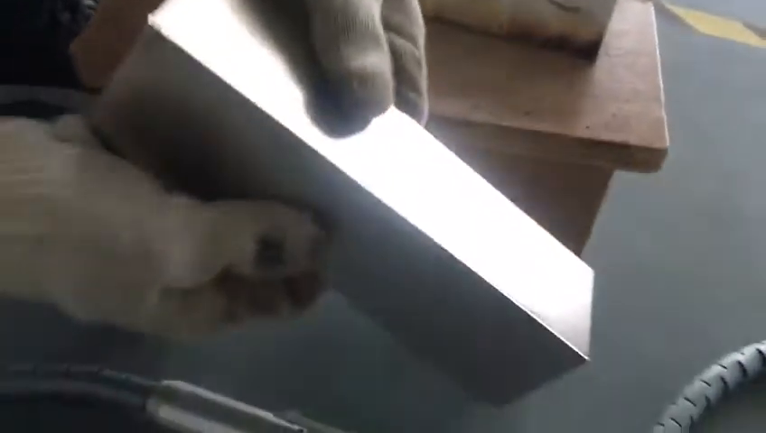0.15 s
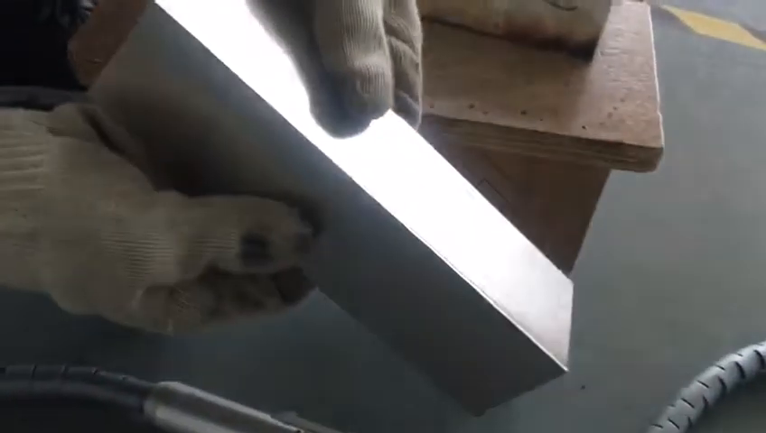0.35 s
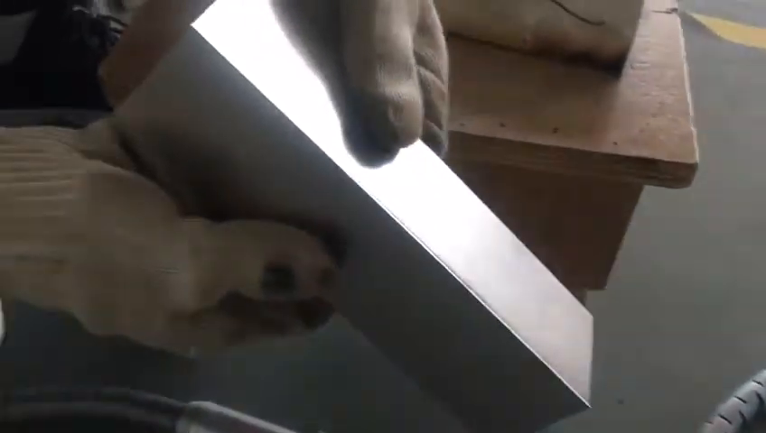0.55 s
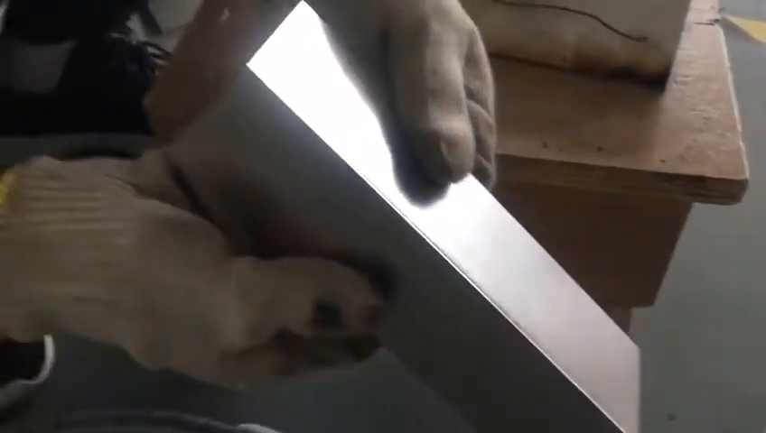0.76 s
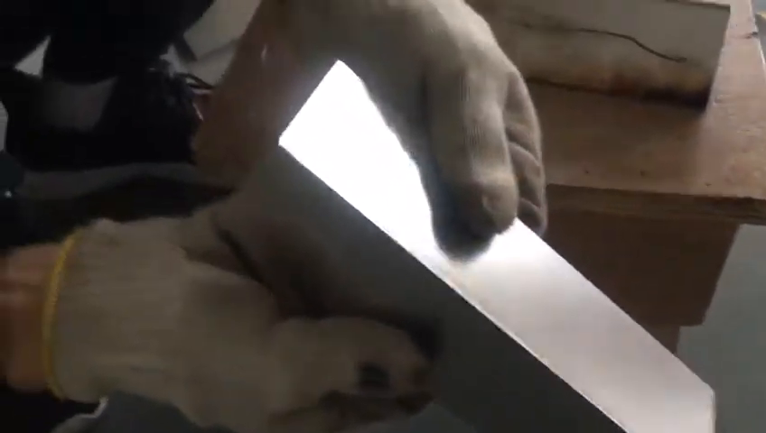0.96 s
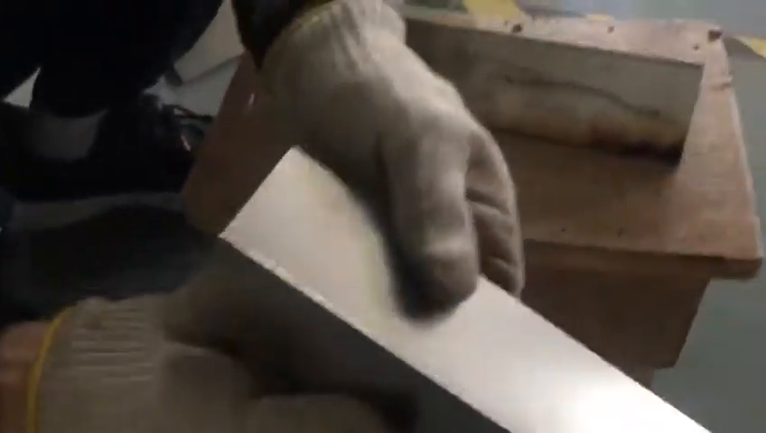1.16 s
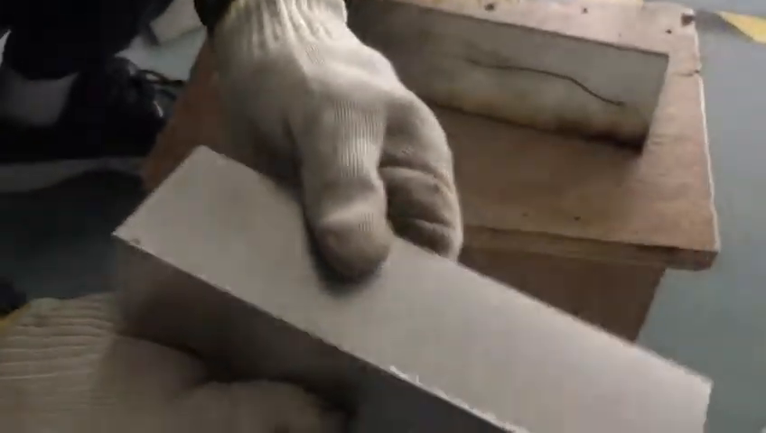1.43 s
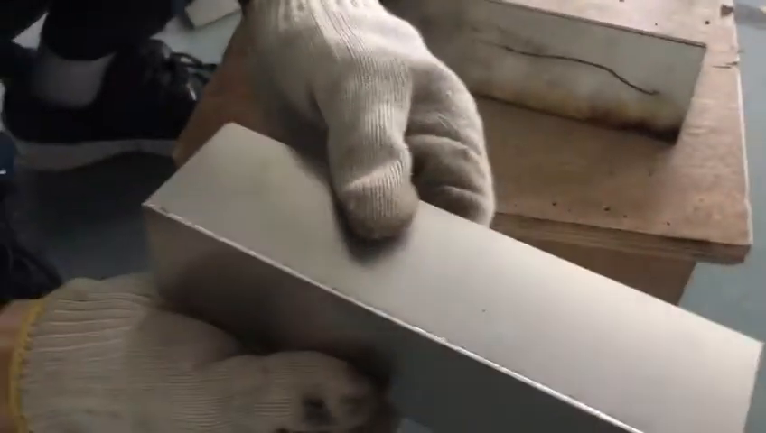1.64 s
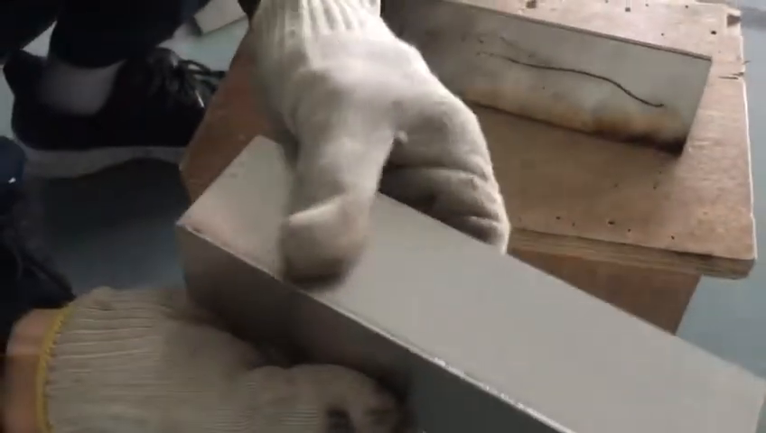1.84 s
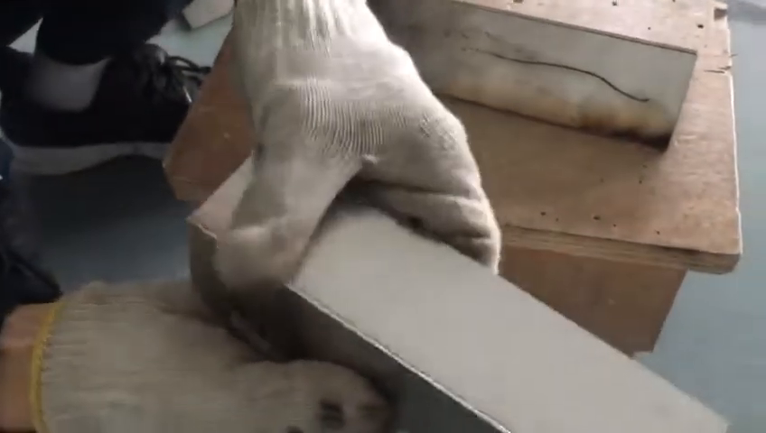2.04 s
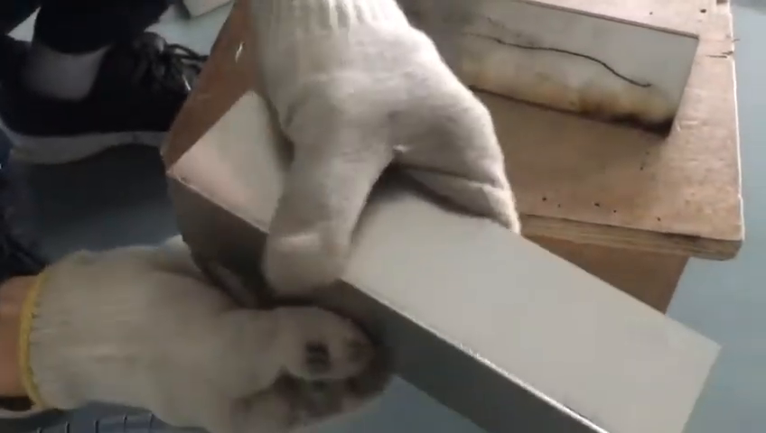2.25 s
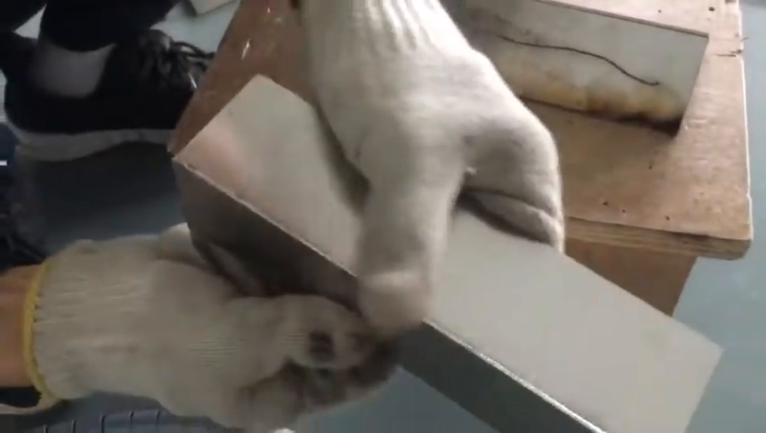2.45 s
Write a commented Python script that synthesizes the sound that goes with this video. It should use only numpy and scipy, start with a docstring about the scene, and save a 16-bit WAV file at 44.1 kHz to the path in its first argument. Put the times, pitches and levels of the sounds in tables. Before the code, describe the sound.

Rapid, steady machine knocking with fan rush and deep hum, faint glove rustle on steel

```python
"""Quick, even knocks and rattles come first: the cooling pump of an idle welding machine in a workshop.
Blows ring damped modes of its housing, and one stretch of coloured noise repeats in every cycle.
Gloved hands turn a steel box section: noise bursts rustle and slip, narrow noise bands ring faintly.
Behind them lie the rush of fans (coloured noise), wavering hums and a low, swelling rumble."""
import sys
import numpy as np
from scipy import signal
from scipy.fft import rfft, irfft
from scipy.io import wavfile

SR = 44100
rng = np.random.default_rng(int(sys.argv[2]) if len(sys.argv) > 2 else 0)


def store_wav(level_fs):
    """Save 16-bit WAV to argv[1]."""
    pcm = np.round(np.clip(np.atleast_2d(level_fs), -1, 1) * 32767)
    wavfile.write(sys.argv[1], SR, pcm.T.astype(np.int16))


N = 114660
T = np.arange(N) / SR
BINS_HZ = np.arange(N // 2 + 1) * SR / N


def from_db(db):
    """Decibels to amplitude gain."""
    return 10 ** (np.asarray(db) / 20)


def rms_one(x):
    """Scale to unit rms."""
    return x / np.sqrt(np.mean(x ** 2) + 1e-20)


def level(rows):
    """Gain along a curve of (s, dB), linear in dB between points."""
    return from_db(np.interp(T, *np.transpose(rows)))


def noise(spectrum, size):
    """Gaussian noise shaped by a spectrum of (Hz, dB); loops without a seam, rms 1."""
    hz, db = np.transpose(spectrum)
    f = np.maximum(np.arange(size // 2 + 1) * SR / size, 1)
    gain = from_db(np.interp(np.log(f), np.log(hz), db)) * (f > 1)
    return rms_one(irfft(rfft(rng.standard_normal(size)) * gain, size))


def drift(rate_hz):
    """Random motion low-passed near rate_hz; rms 1."""
    lowpass = 1 / (1 + (BINS_HZ / rate_hz) ** 2) ** 2
    return rms_one(irfft(rfft(rng.standard_normal(N)) * lowpass, N))


def whine(hz, width_hz):
    """A sine whose pitch wavers by width_hz rms and strength by 2 dB rms; rms 1."""
    pitch_hz = hz + width_hz * drift(2 * width_hz)
    phase = 2 * np.pi * np.cumsum(pitch_hz) / SR
    strength = from_db(2 * drift(2 * width_hz))
    return rms_one(np.sin(phase) * strength)


def swell(start_s, swell_s):
    """An envelope that rises to 1 in swell_s, then dies away."""
    age = np.maximum(T - start_s, 0) / swell_s
    return age * np.exp(1 - age)


CYCLE_S, KNOCK_SPREAD_DB = .1573, 1


def ring(blows, hz, swell_s):
    """One damped mode struck by the same blows (s, dB) each cycle, with random spread in force."""
    clicks = np.zeros(N + SR)
    for start_s, db in blows:
        times_s = np.arange(start_s % CYCLE_S, (N + SR) / SR + CYCLE_S, CYCLE_S)
        at = (times_s * SR).astype(int)
        at = at[at < N + SR]
        clicks[at] += from_db(db + KNOCK_SPREAD_DB * rng.standard_normal(len(at)))
    mode = swell(0, swell_s) * np.sin(2 * np.pi * hz * T)
    run_in = int(2 * CYCLE_S * SR)  # start with the mode already ringing
    return signal.fftconvolve(clicks, mode)[run_in:run_in + N]


# Knocks of the pump. Each row: time in seconds (wraps at the cycle), relative level in dB.
PUMP_KNOCKS = [(.108, 2.5), (.1284, -2.6), (.1474, -8.5), (.1709, -4.7), (.2078, -5)]
# Housing modes. Each row: frequency in Hz, relative level in dB, swell time in seconds.
HOUSING_MODES = [(242.6, -18.5, 0.018), (302.8, -0.5, 0.0069), (323.86, -6.5, 0.023), (569, -18.5, 0.022),
                 (612.5, -19, 0.015), (649, -17.5, 0.0044)]
# Dull thumps. Each row: time in seconds (wraps at the cycle), mean level in dB.
PUMP_THUMPS = [(.172, -33), (.231, -24)]
# Rattle spectrum. Each row: frequency in Hz, relative density in dB per Hz.
RATTLE_SPECTRUM = [(40, -19.5), (75, -13), (105, -1.5), (140, 3), (200, -10), (260, -5.5), (350, -9.5),
                   (440, -10.5), (620, -12), (760, -20), (1300, -22.5), (1650, -18.5), (2000, -40),
                   (4000, -65)]
KNOCK_DB, RATTLE_DB = -22, -36.5
THUMP_HZ, THUMP_SWELL_S = 135.4, .0058


def pump():
    """Knocks ring the housing modes; thumps and a loose rattle repeat with them."""
    knocks = np.zeros(N)
    for hz, db, swell_s in HOUSING_MODES:
        knocks += from_db(KNOCK_DB + db) * ring(PUMP_KNOCKS, hz, swell_s)
    thumps = ring(PUMP_THUMPS, THUMP_HZ, THUMP_SWELL_S)
    one_rattle = noise(RATTLE_SPECTRUM, size=round(CYCLE_S * SR))
    rattle = from_db(RATTLE_DB) * np.resize(one_rattle, N)
    return knocks + thumps + rattle


# Glove rustle over time. Each row: time in seconds, relative level in dB.
RUSTLE_LEVEL = [(0.01, -57.5), (0.04, -63), (0.09, -71.5), (0.42, -66.5), (0.6, -74), (0.97, -71),
                (1.16, -69), (1.33, -71.5), (1.82, -73.5), (1.89, -67), (1.99, -64), (2.08, -65),
                (2.15, -68.5), (2.22, -61), (2.58, -59)]
# Rustle spectrum. Each row: frequency in Hz, relative density in dB per Hz.
RUSTLE_SPECTRUM = [(1500, -12.5), (3500, 4), (6000, -0.5), (8000, -0.5), (11000, -2), (12000, -14)]
RUSTLE_DB, RUSTLE_GRAIN_DB, RUSTLE_GRAIN_HZ = 1.5, 1.5, 120


def glove_rustle():
    """Cloth sliding over steel: coloured noise with a fine random grain in its level."""
    grain = from_db(RUSTLE_DB + RUSTLE_GRAIN_DB * drift(RUSTLE_GRAIN_HZ))
    return level(RUSTLE_LEVEL) * grain * noise(RUSTLE_SPECTRUM, size=N)


# Glove slips as the grip shifts. Each row: start in seconds, level in dB.
GLOVE_SLIPS = [(.24, -61), (.4, -63), (.54, -64), (.66, -67), (1.035, -63), (1.08, -67), (1.145, -62),
               (1.255, -62.5), (1.385, -64), (1.495, -67), (2.26, -69), (2.495, -64)]
# Slip spectrum. Each row: frequency in Hz, relative density in dB per Hz.
SLIP_SPECTRUM = [(2500, -14), (4500, 9), (6500, 3.5), (8500, -3.5), (11500, -22)]
SLIP_SWELL_S = .014


def glove_slips():
    """Short slips of the cloth: bursts of one coloured noise."""
    bursts = sum(from_db(db) * swell(start_s, SLIP_SWELL_S) for start_s, db in GLOVE_SLIPS)
    return bursts * noise(SLIP_SPECTRUM, size=N)


TOUCH_HALF_WIDTH_HZ, TOUCH_SKIRT = 90, 1.1  # skirt: steepness of the flanks


def steel(hz):
    """A steel resonance excited by rubbing: noise in a narrow peak; rms 1."""
    offset = (BINS_HZ - hz) / TOUCH_HALF_WIDTH_HZ
    gain = (1 + offset ** 2) ** (-TOUCH_SKIRT / 2)
    return rms_one(irfft(rfft(rng.standard_normal(N)) * gain, N))


# Light touches on the steel. Each row: start in seconds, ring in Hz, level in dB, swell time in seconds.
STEEL_TOUCHES = [(0.0, 8250, -62, 0.0093), (.38, 7300, -69.5, .06), (1.84, 8700, -70, 0.035),
                 (1.885, 11100, -71, 0.03)]


def steel_touches():
    """Light touches draw thin, hissy rings from the steel resonances."""
    rings = np.zeros(N)
    for start_s, hz, db, swell_s in STEEL_TOUCHES:
        rings += from_db(db) * swell(start_s, swell_s) * steel(hz)
    return rings


# Level curves of the rumbles. Each row: time in seconds, level in dB (relative for the lower two).
RUMBLE_LEVEL = [(0.0, -30), (0.11, -35.5), (0.16, -27), (0.2, -35), (0.25, -25), (0.39, -38), (0.46, -27.5),
                (0.57, -27), (0.67, -33.5), (0.87, -36.5), (0.94, -29), (1.02, -39), (1.28, -37),
                (1.34, -31), (1.42, -24), (1.55, -41.5), (1.67, -25.5), (1.77, -35.5), (2.0, -29),
                (2.06, -41), (2.18, -28), (2.24, -41), (2.6, -41)]
DEEP_LEVEL = [(0.0, -52), (0.13, -31), (0.26, -45), (0.98, -32.5), (1.04, -38), (1.4, -30), (1.64, -54),
              (1.8, -35.5), (2.53, -26.5), (2.6, -31)]
DRONE_LEVEL = [(0.0, -35), (0.18, -46), (0.24, -29.5), (0.42, -40), (0.54, -30), (0.72, -46), (0.85, -34),
               (1.25, -40.5), (1.34, -33), (1.46, -56), (1.53, -32.5), (1.7, -40), (1.82, -35), (2.3, -42),
               (2.43, -31.5), (2.5, -44.5), (2.6, -36)]
RUMBLE_HZ, RUMBLE_WANDER_HZ, RUMBLE_DB = 71.3, 2.35, 1.5
DEEP_HZ, DEEP_DB = 55.8, -2
DRONE_HZ, DRONE_WANDER_HZ = 138.85, 7.2


def rumbles():
    """Three low tones of wandering pitch, each swelling and sinking on its own curve."""
    rumble = from_db(RUMBLE_DB) * level(RUMBLE_LEVEL) * whine(RUMBLE_HZ, RUMBLE_WANDER_HZ)
    deep = from_db(DEEP_DB) * level(DEEP_LEVEL) * whine(DEEP_HZ, RUMBLE_WANDER_HZ)
    drone = level(DRONE_LEVEL) * whine(DRONE_HZ, DRONE_WANDER_HZ)
    return rumble + deep + drone


# Fan noise spectrum. Each row: frequency in Hz, relative density in dB per Hz.
FAN_SPECTRUM = [(20, -19.5), (36, -16.5), (52, -5), (80, 1), (100, -1), (145, -2), (185, -2.5), (215, -4.5),
                (260, -7.5), (305, -3), (360, -3.5), (440, -15.5), (550, -11.5), (630, -10), (740, -18),
                (1100, -18), (1400, -23), (1680, -22.5), (1950, -28.5), (3000, -35.5), (4000, -41.5),
                (4600, -41), (5000, -49), (8000, -57), (11500, -67)]
FANS_DB, FANS_FLUTTER_DB, FANS_FLUTTER_HZ = -29, .5, 28


def fan_air():
    """Rushing air: coloured noise with a slight flutter in level."""
    flutter = from_db(FANS_DB + FANS_FLUTTER_DB * drift(FANS_FLUTTER_HZ))
    return flutter * noise(FAN_SPECTRUM, size=N)


# Motor hums and whines. Each row: frequency in Hz, rms level in dB, pitch spread in Hz.
MOTOR_HUMS = [(571, -51.5, 2.94), (611.5, -51, 4), (780, -55, 5), (879.4, -56, 2.5), (1004, -58.5, 4),
              (1097, -56, 2.5), (1152, -55.5, 8), (1323, -59, 4), (1540, -54.5, 7.2), (1639, -58, 8.3),
              (1702, -58.5, 8.8), (1902, -65, 8.6), (4140, -75.5, 3)]
HUM_SWELL_DB, HUM_SWELL_HZ = 2.5, 7.6


def motor_hums():
    """Motor tones that waver in pitch and swell at random."""
    tones = np.zeros(N)
    for hz, db, width_hz in MOTOR_HUMS:
        swelling = from_db(HUM_SWELL_DB * drift(HUM_SWELL_HZ))
        tones += from_db(db) * rms_one(swelling * whine(hz, width_hz))
    return tones


def scene():
    """Sum of the machine and the hands, mono."""
    hands = glove_rustle() + glove_slips() + steel_touches()
    background = rumbles() + fan_air() + motor_hums()
    return (pump() + hands + background)[None]


CUTOFF_HZ = 11600


def record(dry):
    """Steep elliptic low-pass: 0.1 dB ripple, 80 dB stopband."""
    lowpass = signal.ellip(10, .1, 80, CUTOFF_HZ, fs=SR, output="sos")
    return signal.sosfilt(lowpass, dry)


dry = scene()
out = record(dry)
store_wav(out)
```